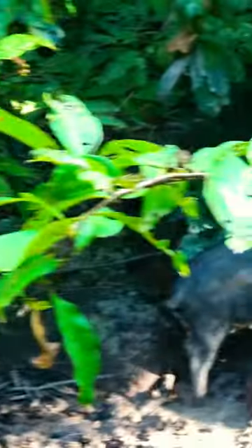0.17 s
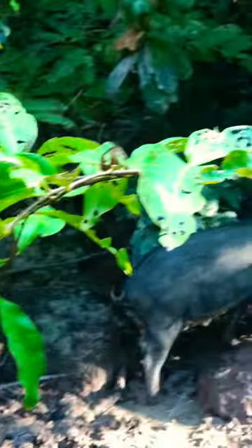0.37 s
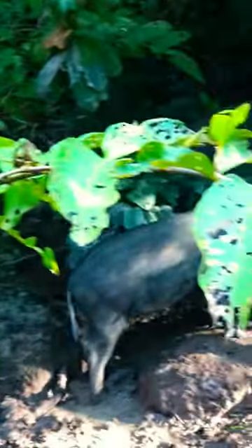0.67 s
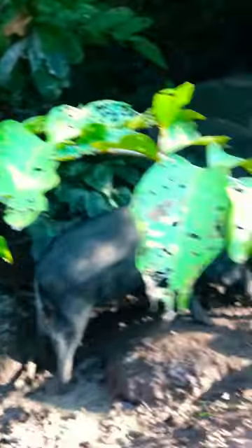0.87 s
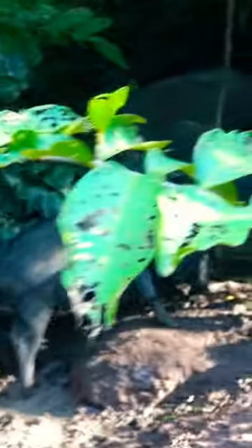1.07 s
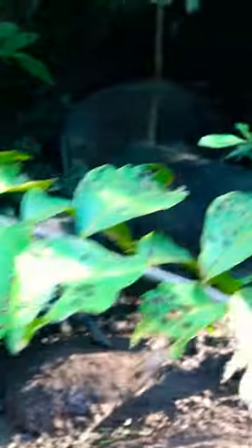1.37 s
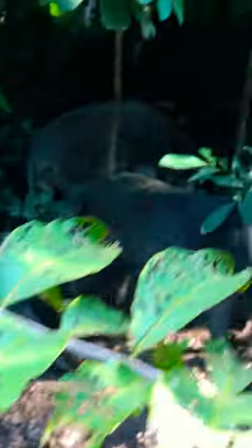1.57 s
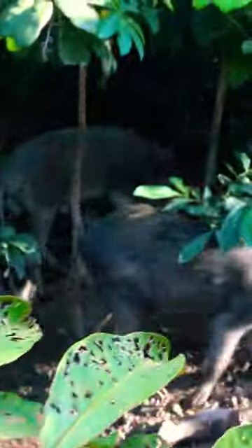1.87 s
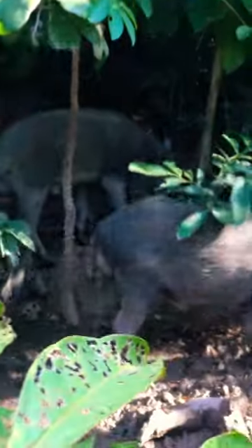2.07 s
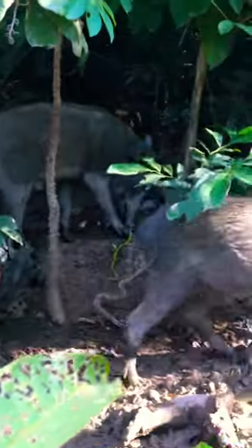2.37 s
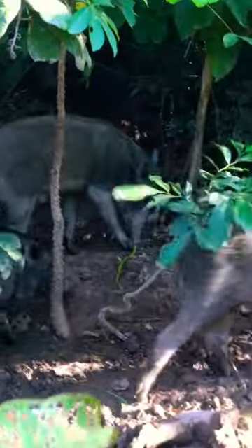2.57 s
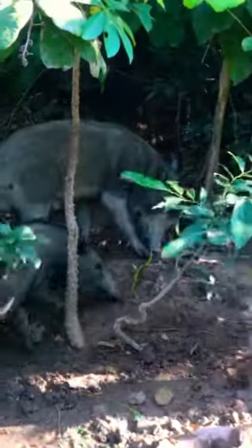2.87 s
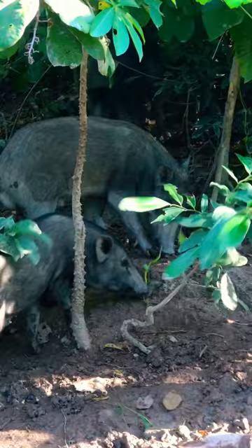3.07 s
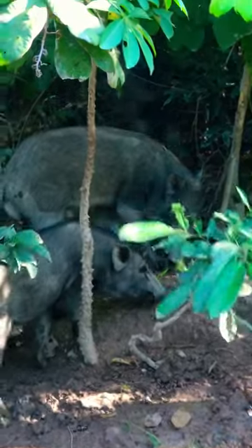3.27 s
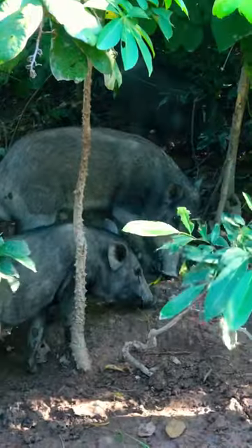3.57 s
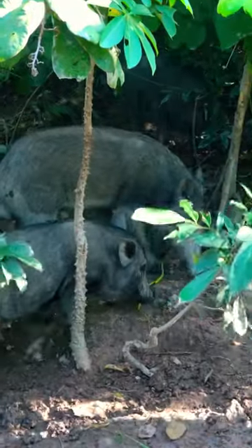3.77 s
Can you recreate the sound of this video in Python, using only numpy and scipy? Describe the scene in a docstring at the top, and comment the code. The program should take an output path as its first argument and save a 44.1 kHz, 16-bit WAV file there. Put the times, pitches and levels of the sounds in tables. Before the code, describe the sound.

Dry leaves rustle and twigs snap throughout as wild boars root in a thicket, with soft scuffs and thuds on the earth. The scraping and crunching are busiest from about 1.8 to 3 seconds, then ease toward the end near 4 seconds. A far bird gives faint falling whistles between 1.4 and 2.8 seconds. A low wavering hum, like a distant engine, and soft hiss lie underneath.

```python
"""Dry leaves rustle and twigs snap as wild boars root about at the edge of a thicket.
Snouts and hooves scuff the earth and crunch the litter; the trees scatter the sound.
Behind them: a faint falling bird whistle, a low wavering hum as of a far engine, a soft hiss."""
import sys
import numpy as np
from scipy import signal
from scipy.io import wavfile

SR = 44100
rng = np.random.default_rng(int(sys.argv[2]) if len(sys.argv) > 2 else 0)


def log_audio(samples):
    """Write samples as a 16-bit WAV file to the path given in sys.argv[1]."""
    # one column per channel
    frames = np.atleast_2d(samples).T
    # limit to full scale, then quantise
    limited = np.clip(frames, -1, 1)
    pcm = np.round(limited * 32767).astype(np.int16)
    wavfile.write(sys.argv[1], SR, pcm)


N = 173313

# stirring of the dry leaves: time_s, level_db
LEAF_STIR = [(0.0, -57), (0.13, -54.5), (0.22, -61), (0.48, -63), (0.51, -56.5), (0.54, -59.5), (0.69, -63),
             (0.77, -56), (0.8, -63.5), (1.19, -60), (1.75, -60.5), (1.77, -55), (1.81, -57.5), (1.97, -61),
             (1.99, -59.5), (2.08, -58.5), (2.2, -55), (2.9, -57.5), (2.91, -53.5), (2.94, -61.5),
             (3.7, -65), (3.93, -64)]


def from_db(db):
    """Decibels to gain."""
    return 10 ** (np.asarray(db) / 20)


def unit_rms(x):
    """Scale to rms 1."""
    return x / np.sqrt(np.mean(x ** 2) + 1e-20)


def envelope(rows):
    """Gain per sample from rows of time_s, level_db."""
    return from_db(np.interp(np.arange(N) / SR, *np.transpose(rows)))


def drift(rate_hz):
    """Slow random wander, rms 1."""
    hop, settle = 40, 2000
    pole = np.exp(-2 * np.pi * rate_hz * hop / SR)
    noise = rng.standard_normal(N // hop + settle + 2)
    slow = signal.lfilter([1], [1, -2 * pole, pole * pole], noise)[settle:]
    return np.interp(np.arange(N) / hop, np.arange(len(slow)), unit_rms(slow))


def band(x, low_hz, high_hz, order=2):
    """Butterworth band-pass."""
    sos = signal.butter(order, [low_hz, min(high_hz, .45 * SR)], "band", fs=SR, output="sos")
    return signal.sosfilt(sos, x + 1e-18)


def add(out, start_s, sound):
    """Mix sound into out at start_s."""
    i = max(int(start_s * SR), 0)
    out[i:i + len(sound)] += sound[:max(N - i, 0)]


def fractures(per_s, spread_db):
    """Random impulses, most small, a few large."""
    sizes = from_db(spread_db * np.minimum(rng.exponential(1, N), 4.5))
    signs = rng.choice([-1, 1], N)
    return unit_rms(sizes * signs * (rng.random(N) < per_s / SR))


def coloured(sources, spectrum, flicker_db, flicker_hz):
    """Two sources alternate across narrow bands, each band with its own gain and flicker."""
    out, edges_hz = 0, np.geomspace(22, 18000, 31)
    freq_hz, gain_db = np.transpose(spectrum)
    for k, (low_hz, high_hz) in enumerate(zip(edges_hz, edges_hz[1:])):
        centre_hz = np.sqrt(low_hz * high_hz)
        if freq_hz[0] / 2 < centre_hz < freq_hz[-1] * 2:
            band_db = np.interp(np.log(centre_hz), np.log(freq_hz), gain_db)
            gain = from_db(band_db + flicker_db * drift(flicker_hz))
            out = out + gain * band(sources[k % 2], low_hz, high_hz)
    return unit_rms(out)


def thicket(x, wet_db, t60_s):
    """Ground, stems and leaves return a short spray of echoes."""
    t = np.arange(SR // 3) / SR
    spray = rng.standard_normal(len(t)) * (rng.random(len(t)) < .15)
    spray *= from_db(-60 * t / t60_s) * (t > .001)
    return x + from_db(wet_db) * signal.fftconvolve(x, spray / np.linalg.norm(spray))[:N]


def crackle(spectrum, per_s, spread_db, wet_db, flicker_db):
    """Dense fractures in one material, from several spots with their own echoes."""
    def spot():
        return thicket(fractures(per_s, spread_db), wet_db, t60_s=0.14)
    shared = spot() + spot()
    sources = [shared + spot() + spot() for _ in range(2)]
    return coloured(sources, spectrum, flicker_db, flicker_hz=26)


def bursts(rows, per_s, spread_db, edge_ratio, attack_s):
    """Band-limited runs of fractures: fast attack, Gaussian decay."""
    out, t = np.zeros(N), np.arange(SR // 5) / SR
    for start_s, decay_s, level_db, centre_hz in rows:
        shape = np.minimum(t / attack_s, 1) * np.exp(-(t / decay_s) ** 2)
        run = fractures(per_s, spread_db)[:len(t)] * shape
        run = band(run, centre_hz / edge_ratio, centre_hz * edge_ratio)
        add(out, start_s, from_db(level_db) * unit_rms(run) * np.sqrt(np.mean(shape ** 2)))
    return out


def leaf_rustle():
    """Stirred dry leaves crackle in the treble."""
    # freq_hz, gain_db
    spectrum = [(1000, -5.5), (2500, -3.5), (4200, -1), (6000, 3), (8500, -1.5), (12000, 1.5), (15500, -8)]
    rustle = crackle(spectrum, per_s=1000, spread_db=3, wet_db=0, flicker_db=1.5)
    return envelope(LEAF_STIR) * from_db(-1) * rustle


def rooting():
    """Snouts push through litter: a midrange scrape."""
    # time_s, level_db
    pushes = [(0.0, -78), (0.13, -62.5), (0.31, -68.5), (0.32, -60), (0.35, -69), (0.48, -64), (0.49, -59),
              (0.56, -74), (0.61, -66), (1.76, -56.5), (1.77, -51.5), (1.86, -57.5), (2.21, -59.5),
              (2.22, -48.5), (2.32, -57.5), (2.33, -52.5), (2.57, -60), (2.67, -52.5), (2.79, -60.5),
              (2.87, -50.5), (2.97, -64), (3.41, -65), (3.74, -71), (3.93, -64)]
    # freq_hz, gain_db
    spectrum = [(450, -11.5), (600, -3), (850, -6.5), (1220, 1), (1600, -0.5), (2000, -2), (2400, 0),
                (3200, -5), (4200, -1.5), (5500, -8), (12000, -18)]
    scrape = crackle(spectrum, per_s=300, spread_db=3.5, wet_db=-0.5, flicker_db=1.8)
    return envelope(pushes) * from_db(-2) * scrape


def soil_scuffs():
    """Hooves and snouts shift soil: a low scuff."""
    # time_s, level_db
    shifts = [(0.0, -57), (0.06, -71), (0.54, -66), (0.55, -81), (0.77, -59.5), (1.19, -71), (1.79, -57.5),
              (1.82, -53.5), (1.99, -71.5), (2.07, -58.5), (2.1, -67), (2.36, -58.5), (2.56, -67.5),
              (2.65, -57), (2.79, -59), (2.89, -55), (2.94, -70), (3.39, -59.5), (3.67, -72.5),
              (3.85, -59.5)]
    # freq_hz, gain_db
    spectrum = [(90, -15), (140, -1), (280, 1.5), (370, 1.5), (470, -4), (600, -1.5), (780, -7.5),
                (1800, -12)]
    return envelope(shifts) * crackle(spectrum, per_s=300, spread_db=2.5, wet_db=2, flicker_db=1.74)


def stem_ticks():
    """Small leaf stems break at random, each at its own pitch; level follows the stirring."""
    per_s, low_hz, high_hz, t60_cycles = 70, 2280, 9900, 12
    out, t = np.zeros(N), np.arange(SR // 100) / SR
    for when, pitch, size in rng.random((int(per_s * N / SR), 3)):
        pitch_hz = low_hz * (high_hz / low_hz) ** pitch
        level_db = 6 - 3 * np.log(size + .02)
        decay = from_db(level_db - 60 * t * pitch_hz / t60_cycles)
        add(out, when * N / SR, decay * np.sin(2 * np.pi * pitch_hz * t))
    return envelope(LEAF_STIR) * thicket(out, wet_db=-2, t60_s=0.15)


def twig_snaps():
    """Each twig gives a sharp crack and a few cycles of ringing wood, with its own echoes."""
    # start_s, ring_db, pitch_hz, crack_db, t60_cycles
    snaps = [(.213, -48, 1260, -68, 14), (.318, -43, 1760, -64, 26), (.489, -38, 2030, -55, 5.5),
             (.509, -38.5, 2880, -50, 9.1), (.521, -47, 2670, -61, 10), (.664, -51, 1290, -71, 12),
             (0.711, -40, 4610, -59, 12), (0.783, -44.5, 1500, -66, 10), (1.028, -45.5, 1130, -55, 6),
             (1.117, -43, 1600, -50.5, 13), (1.1698, -38.5, 3270, -52, 22), (1.235, -45.5, 3120, -64, 10),
             (1.288, -51, 1560, -71, 7.4), (1.392, -40, 3850, -59, 15), (1.407, -43, 1430, -68, 13),
             (1.429, -39, 3200, -60, 13), (1.5, -50, 2500, -57, 6), (1.514, -37, 3430, -56, 10),
             (1.521, -41, 3300, -57, 6.5), (1.623, -40.5, 2850, -52.5, 8.1), (1.652, -52, 1870, -69, 11),
             (1.771, -32, 3400, -42.5, 12), (1.814, -38, 3020, -67, 11), (1.895, -38, 2070, -58, 7.3),
             (1.942, -46, 2900, -52, 6), (1.984, -45, 5900, -53, 17), (2.044, -41.5, 2910, -57, 13),
             (2.22, -43, 1160, -56, 10), (2.246, -34.5, 2740, -62, 7.6), (2.3314, -35, 2320, -57, 10.4),
             (2.384, -41, 1220, -64, 18), (2.384, -36.5, 4150, -63, 16), (2.411, -42, 2300, -64, 10),
             (2.459, -44, 5200, -52.5, 7), (2.469, -46, 4400, -49, 7), (2.49, -43, 4250, -58, 14),
             (2.505, -36, 4100, -49.5, 14), (2.662, -34, 2110, -51, 9.1), (2.823, -42.5, 1940, -71, 14),
             (2.882, -37, 2550, -59, 8.8), (2.992, -44, 2190, -60, 8), (3.051, -41, 4230, -53.5, 19),
             (3.078, -47.5, 4040, -63, 21), (3.211, -56, 2880, -49, 22), (3.287, -45, 2840, -67, 9),
             (3.327, -46.5, 1370, -58, 9.8), (3.361, -44.5, 3150, -63, 14), (3.442, -44.5, 3200, -72, 26),
             (3.455, -46, 3150, -68, 24), (3.583, -48, 2660, -56.5, 6.4)]
    ring_trim_db, crack_trim_db, wet_db, echo_t60_s = 0.5, 10, -2.5, 0.076
    out, t = np.zeros(N), np.arange(SR // 6) / SR
    for start_s, ring_db, pitch_hz, crack_db, t60_cycles in snaps:
        splinter, spray = rng.standard_normal((2, len(t)))
        ring = np.sin(2 * np.pi * pitch_hz * t) * from_db(-60 * t * pitch_hz / t60_cycles)
        crack = band(splinter * np.exp(-t / 0.0007), 1100, 12000, order=1)
        snap = from_db(ring_db + ring_trim_db) * ring + from_db(crack_db + crack_trim_db) * crack
        spray *= from_db(-60 * t / echo_t60_s) * (t > .001)
        echoes = signal.fftconvolve(snap, spray / np.linalg.norm(spray))[:len(t)]
        add(out, start_s, snap + from_db(wet_db) * echoes)
    return out


def litter_crunches():
    """Clumps of litter are crushed."""
    # start_s, decay_s, level_db, centre_hz
    crunches = [(0.507, .025, -56.5, 6030), (.752, 0.021, -62, 9000), (1.116, .025, -58, 1700),
                (1.195, 0.035, -59.5, 5000), (1.345, 0.036, -58, 10500), (1.772, 0.024, -52.5, 9300),
                (1.982, 0.038, -51.5, 5440), (2.218, 0.021, -52.5, 7000), (2.331, 0.014, -67, 2230),
                (2.653, 0.065, -52, 2320), (2.906, .025, -56, 9500), (3.156, 0.021, -56, 3700),
                (3.443, 0.015, -67, 3100)]
    return bursts(crunches, per_s=3000, spread_db=3, edge_ratio=1.32, attack_s=0.0012)


def earth_thuds():
    """Hooves and snouts strike soft earth; near 0.75 s a boar snuffles."""
    # start_s, decay_s, level_db, centre_hz
    thuds = [(.755, 0.065, -72, 680), (.8, 0.033, -62.5, 252), (1.028, 0.012, -73, 600),
             (1.428, 0.0077, -50.5, 224), (1.43, 0.011, -57, 890), (1.505, 0.025, -57, 445),
             (1.655, 0.0097, -53, 640), (1.695, 0.01, -68, 318), (1.81, 0.026, -61, 627),
             (1.82, .025, -60, 270), (1.895, 0.0066, -56, 564), (1.935, 0.0096, -55, 327),
             (2.12, .015, -59, 690), (2.265, .025, -54, 347), (2.335, .04, -54, 221),
             (2.452, 0.0093, -57, 750), (2.878, 0.017, -57, 397)]
    return bursts(thuds, per_s=2000, spread_db=1.5, edge_ratio=1.39, attack_s=0.0017)


def bird():
    """A far bird's thin whistles fall and level off."""
    # start_s, length_s, start_hz, end_hz, level_db
    whistles = [(1.391, .14, 3800, 2225, -63.5), (1.793, .09, 3230, 2740, -60),
                (2.037, 0.11, 2600, 2335, -63), (2.72, 0.064, 2430, 2290, -60)]
    out = np.zeros(N)
    for start_s, length_s, start_hz, end_hz, level_db in whistles:
        progress = np.linspace(0, 1, int(length_s * SR))
        pitch_hz = end_hz + (start_hz - end_hz) * (1 - progress) ** 1.5
        swell = np.sqrt(np.abs(np.sin(np.pi * progress)))
        add(out, start_s, from_db(level_db) * swell * np.sin(2 * np.pi * np.cumsum(pitch_hz) / SR))
    return thicket(out, wet_db=-3, t60_s=0.52)


def far_hum():
    """Low hum, as of a far engine, wavering in pitch and level."""
    # pitch_ratio, level_db
    partials = [(1, -53), (2, -68), (6.17, -76.5)]
    # time_s, gain_db
    swells = [(0, 1.5), (.3, -1.5), (.46, -4), (.62, 2), (1.2, -1.5), (1.4, -2), (1.88, 3), (2.45, -3),
              (2.62, 2.5), (3.0, -2), (3.18, -1.5), (3.36, 3), (3.7, -1), (3.93, 2.5)]
    pitch_hz = 61.15 + 0.606 * drift(rate_hz=2.25)
    phase = 2 * np.pi * np.cumsum(pitch_hz) / SR
    hum = 0
    for pitch_ratio, level_db in partials:
        waver_db = 1.13 * drift(rate_hz=6.2)
        hum = hum + np.sqrt(2) * from_db(level_db + waver_db) * np.sin(pitch_ratio * phase)
    return hum * envelope(swells)


def air():
    """Low rumble and soft hiss."""
    # freq_hz, gain_db
    spectrum = [(25, -10), (33, -5), (43, 30.5), (52, 20), (72, 25), (88, 24.5), (125, 15), (160, 14),
                (370, 3), (750, -7), (1300, 0), (2300, -8), (5000, -8.5), (9000, -4), (13000, -12),
                (15500, -7)]
    noise = rng.standard_normal((2, N))
    return from_db(-59) * coloured(noise, spectrum, flicker_db=1.45, flicker_hz=6.5)


def scene():
    """Mono mix at one microphone."""
    impacts = litter_crunches() + earth_thuds()
    foraging = leaf_rustle() + rooting() + soil_scuffs()
    foraging *= from_db(0.98 * drift(rate_hz=39))  # uneven pushing moves all the litter together
    return (foraging + stem_ticks() + twig_snaps() + impacts + bird() + far_hum() + air())[None]


def record(dry):
    """The microphone ripples the treble; a steep low-pass cuts the top."""
    # centre_hz, width_hz, gain_db
    ripples = [(4820, 210, -3), (7580, 400, -3.5), (9130, 1450, 3), (10380, 760, -7.5), (11500, 620, 2)]
    cutoff_hz = 15750
    for centre_hz, width_hz, gain_db in ripples:
        resonance = signal.lfilter(*signal.iirpeak(centre_hz, centre_hz / width_hz, fs=SR), dry)
        dry = dry + (from_db(gain_db) - 1) * resonance
    return signal.sosfilt(signal.ellip(12, .2, 70, cutoff_hz, fs=SR, output="sos"), dry)


dry = scene()
out = record(dry)
log_audio(out)
```